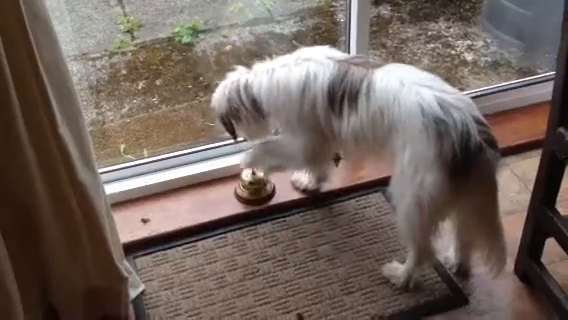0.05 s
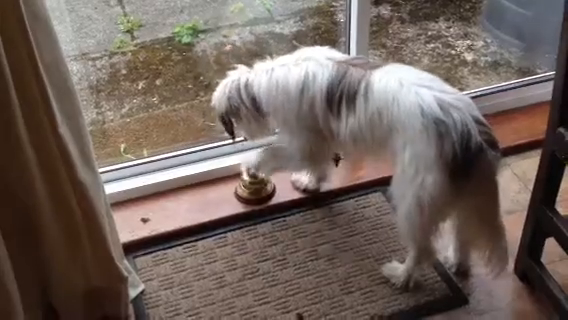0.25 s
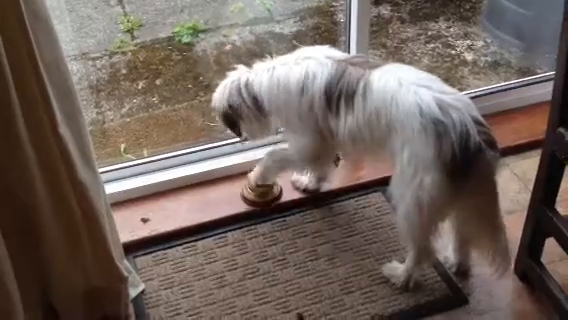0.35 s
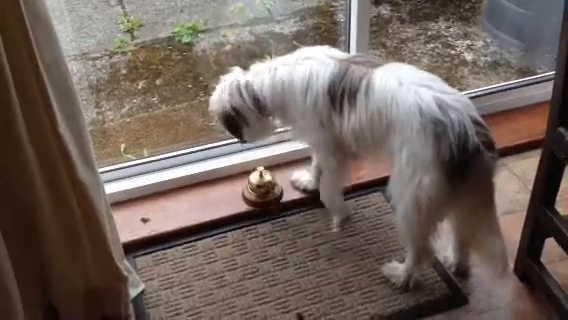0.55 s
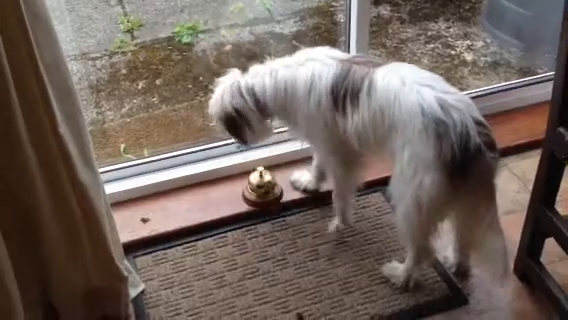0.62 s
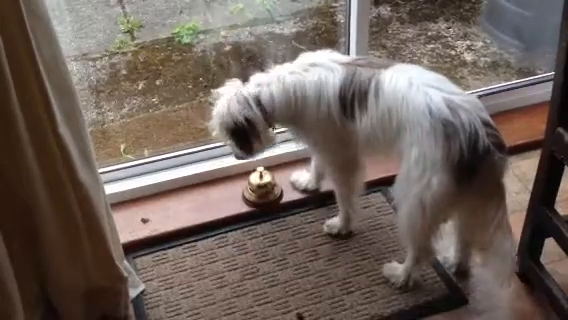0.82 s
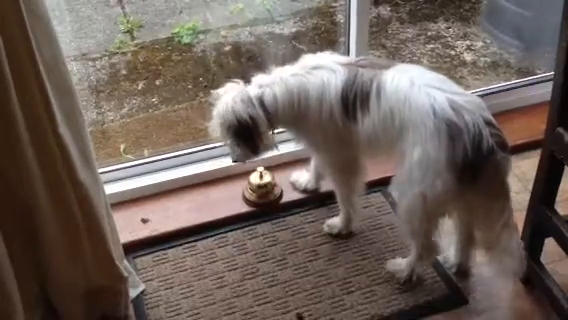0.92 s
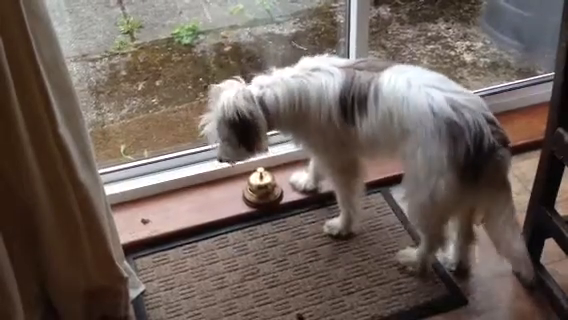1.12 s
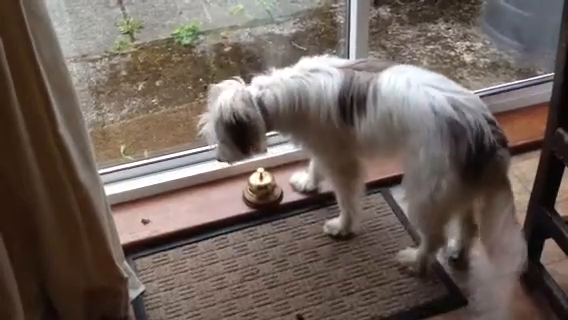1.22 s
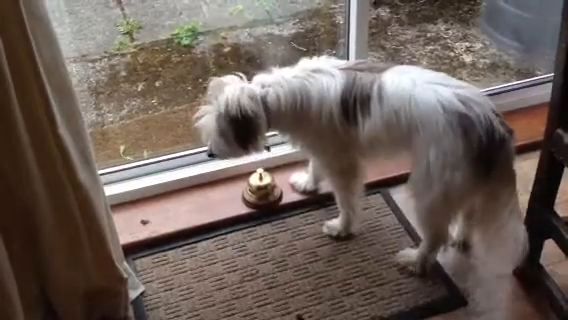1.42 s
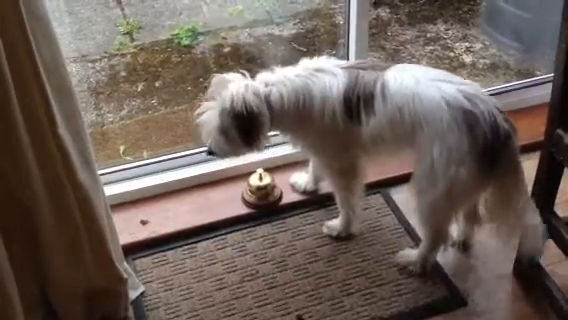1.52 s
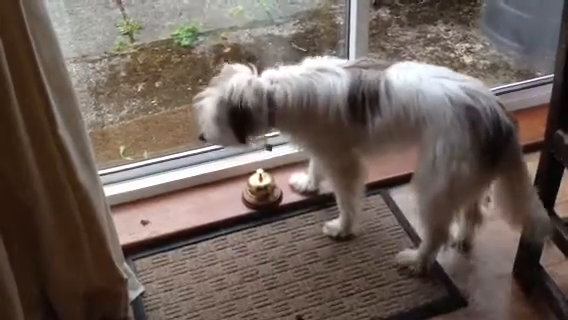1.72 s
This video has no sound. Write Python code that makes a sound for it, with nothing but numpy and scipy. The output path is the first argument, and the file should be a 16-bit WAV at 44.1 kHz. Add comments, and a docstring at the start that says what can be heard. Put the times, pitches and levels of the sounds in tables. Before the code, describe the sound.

Faint wooden rubbing and tiny clicks lead to a bright counter bell strike, pawed by a dog; the high ring decays slowly over soft room hush, with faint paw rustles, picked up by a phone nearby indoors.

```python
"""A dog paws a brass desk bell on a wooden sill, a few metres from the phone in a quiet, hushed room.
An earlier muted blow dies away while the base judders on the wood: stick-slip jolts and rubbing excite resonances.
Claw and plunger ticks (band-passed noise) lead to the clapper strike near 0.23 s and a weaker blow just after.
The strike cracks (noise), thumps the sill and rings the dome in split, beating modes (decaying sines).
Under the long ring the judder fades out; faint rustles of fur and paws and three late ticks follow."""
import sys
import numpy as np
from scipy import signal
from scipy.fft import rfft, irfft, next_fast_len
from scipy.io import wavfile
from scipy.ndimage import uniform_filter1d

SR = 44100
rng = np.random.default_rng(int(sys.argv[2]) if len(sys.argv) > 2 else 0)


def linear_from_db(decibels):
    """Turn decibels (scalar or array-like) into linear amplitude factors; 0 gives 1."""
    return 10 ** (np.asarray(decibels, float) / 20)


def file_out(sig):
    """Save sig as 16-bit WAV at sys.argv[1]."""
    # one column per channel
    cols = np.atleast_2d(sig).T
    # limit, then scale
    lim = np.clip(cols, -1, 1)
    pcm = np.round(lim * 32767).astype(np.int16)
    wavfile.write(sys.argv[1], SR, pcm)


N = 77175
LEAD = SR // 4  # samples computed ahead of t = 0, to hold the earlier blow
T = np.arange(-LEAD, N) / SR  # s

# clapper blows: t/s, ring level/dB, crack level/dB, longest T60 that the paw allows/s
BLOWS = [(-.09, -39, -38, .45), (.2328, 0, -16, 20), (.2465, -30, -28, 20)]


def curve(table, x, col=1, log=False):
    """Linear interpolation of a table column, over the first column or its logarithm."""
    points = np.array(table, float)
    scale = np.log if log else np.asarray
    return np.interp(scale(x), scale(points[:, 0]), points[:, col])


def unit(x):
    """Normalisation to an rms value of 1."""
    return x / np.sqrt(np.mean(x ** 2))


def noise():
    """White Gaussian noise: equal mean power at all frequencies."""
    return rng.standard_normal(len(T))


def shape(x, gain):
    """Linear filtering: the spectrum is multiplied by a real gain, a function of f/Hz."""
    n = next_fast_len(len(x))
    hz = np.maximum(np.arange(n // 2 + 1) * SR / n, 1)
    return irfft(rfft(x, n) * gain(hz), n)[:len(x)]


def band(x, hz, width):
    """Damped resonator: a pole pair whose radius sets the bandwidth; about unit gain at the centre."""
    angle = 2 * np.pi * hz / SR
    radius = np.exp(-np.pi * width / SR)
    gain = (1 - radius * radius) / 2
    return signal.lfilter([gain, 0, -gain], [1, -2 * radius * np.cos(angle), radius * radius], x)


def fade(t0, t60, rise=.0013):
    """Exponential decay of 60 dB per t60, after a build-up over the contact time (rise, s)."""
    age = np.maximum(T - t0, 0)
    return (1 - np.exp(-age / rise)) * np.exp(-np.log(1000) * age / t60)


def air():
    """Stationary broadband noise: the hush of room and microphone, with a slight slow flicker in level."""
    # spectrum of the hush, relative: f/Hz, level per Hz/dB
    hush_spectrum = [(25, -24.5), (100, -18.5), (200, -16), (332, -18.5), (700, -18.5), (1200, -19),
                     (2640, -25), (4780, -27), (7500, -26), (10000, -36), (13000, -27.5), (15600, -31.5)]
    level_db, flicker_db = -76, 0.5  # rms in the reference band; rms of the flicker
    hush = shape(noise(), lambda hz: linear_from_db(curve(hush_spectrum, hz, log=True)))
    reference_band = shape(hush, lambda hz: (hz > 1300) * (hz < 2600))
    reference = np.sqrt(np.mean(reference_band ** 2))
    flicker = unit(uniform_filter1d(uniform_filter1d(noise(), 3000), 3000))
    return hush / reference * linear_from_db(level_db + flicker_db * flicker)


def room(x):
    """Diffuse reverberation: convolution with octave-band noise, each band decaying at its own rate."""
    # reverberation time: f/Hz, T60/s
    reverb_times = [(200, 0.28), (1500, 0.3), (6000, 0.72), (15000, 0.1)]
    t = np.arange(SR) / SR
    build_up = 1 - np.exp(-t / .006)
    tail = 0
    for hz in 125 * 2. ** np.arange(8):
        limits = [hz / 2 ** .5, min(hz * 2 ** .5, SR / 2.2)]
        octave = signal.butter(2, limits, "band", fs=SR, output="sos")
        part = signal.sosfilt(octave, rng.standard_normal(SR))
        t60 = curve(reverb_times, hz, log=True)
        decay = np.exp(-np.log(1000) * t / t60)
        tail = tail + part * decay * build_up / np.sqrt(t60)
    return signal.fftconvolve(x, tail / np.sqrt(np.sum(tail ** 2)))[:len(x)]  # unit-energy tail


def tint(hz, width):
    """Resonant filtering of noise: two equal resonators in cascade, scaled to rms 1."""
    return unit(band(band(noise(), hz, width), hz, width))


def rustles():
    """Friction noise of fur and paws: band-passed noise under Gaussian swells."""
    # t/s, level/dB, f/Hz, bandwidth of each resonator/Hz, length between the 1/e points/s
    rustle_rows = [(.73, -72, 9000, 14000, .03), (.76, -70, 700, 600, .06), (.995, -66, 5000, 14000, .02),
                   (1.07, -70, 4800, 3000, .015), (1.265, -66, 2200, 2500, .03),
                   (1.385, -69, 12500, 5000, .03), (1.4, -65, 1800, 2000, .07), (1.5, -72, 3500, 6000, .06),
                   (1.45, -72, 350, 300, .2), (.9, -74, 1500, 1200, .04)]
    out = 0
    for t0, db, hz, width, length in rustle_rows:
        swell = np.exp(-((T - t0) / length * 2) ** 2)
        out = out + linear_from_db(db) * swell * tint(hz, width)
    return out


def ticks():
    """Brief impacts of claw and plunger: band-passed noise with a fast rise and exponential decay."""
    # the first three belong to the earlier blow
    # t/s, level/dB, f/Hz, bandwidth of each resonator/Hz, T60/s
    tick_rows = [(-.08, -53, 7700, 300, .5), (-.08, -57, 7200, 3000, .5), (-.08, -60, 13500, 3500, .5),
                 (.1893, -48, 6500, 6000, .02), (.2085, -46, 7200, 2500, .05),
                 (.2135, -43, 6800, 2500, .04), (.2203, -31, 6500, 8000, .022),
                 (.2245, -38, 8300, 3000, .04), (.2205, -42, 1500, 1500, .03),
                 (.2335, -36, 1500, 1500, .05), (1.46, -62, 6000, 2000, .015),
                 (1.4863, -56, 5800, 2500, .02), (1.515, -61, 6200, 2000, .015)]
    out = 0
    for t0, db, hz, width, t60 in tick_rows:
        out = out + linear_from_db(db) * fade(t0, t60, .0006) * tint(hz, width)
    return out


def small_sounds():
    """Uneven contact: amplitude modulation by smoothed noise roughens ticks and rustles."""
    grain = linear_from_db(1 * unit(uniform_filter1d(noise(), size=90)))  # 1 dB rms
    return (ticks() + rustles()) * unit(grain)


def sill():
    """Stick-slip excitation: jolts and rubbing noise ring the wood's resonances; the strike thumps it."""
    # wood resonances, six low ones and then three above 1 kHz: f/Hz, bandwidth/Hz, level/dB
    wood_modes = [(154, 43, -9), (186, 40, -3.5), (232, 40, -6), (368, 100, -8.5), (466.3, 29, -9.5),
                  (600.5, 71, -16.5), (1382, 150, -3.5), (1675, 100, -4), (2142, 220, -12)]
    # base dragging on the sill: t/s, level of the low modes/dB, level of the modes above 1 kHz/dB
    drag_levels = [(0, -61.5, -81), (.065, -63, -100.5), (.085, -55.5, -63), (.13, -57.5, -68),
                   (.185, -60, -72), (.22, -46.5, -44.5), (.3, -52.5, -55), (.35, -58.5, -60),
                   (.39, -58.5, -55), (.45, -56.5, -63), (.49, -58.5, -59.5), (.55, -67.5, -71.5),
                   (.62, -72.5, -80.5), (.72, -85.5, -89.5)]
    low_modes, high_modes = wood_modes[:6], wood_modes[6:]

    judder_per_s, scatter, jolt_db = 42, 0.15, 3.5  # median rate; log-normal spread; spread in level
    rub_low_db, rub_high_db = 3.5, 7  # rubbing relative to the jolts
    chance = rng.standard_normal((200, 2))
    intervals = np.exp(scatter * chance[:, 0]) / judder_per_s * SR
    at = np.cumsum(intervals).astype(int)
    inside = at < len(T)
    jolts = np.zeros(len(T))
    jolts[at[inside]] = linear_from_db(jolt_db * chance[inside, 1])
    low_push = unit(jolts) + linear_from_db(rub_low_db) * noise()
    high_push = unit(jolts) + linear_from_db(rub_high_db) * noise()

    thump = unit(sum(linear_from_db(db) * band(noise(), hz, width) for hz, width, db in low_modes))
    out = linear_from_db(-49.5) * fade(0.26, 0.28, 0.0035) * thump
    for col, push, modes in ((1, low_push, low_modes), (2, high_push, high_modes)):
        wood = 0
        for k, (hz, width, db) in enumerate(modes):
            wood = wood + (-1) ** k * linear_from_db(db) * band(push, hz, width)  # alternating polarity
        dragging = T < drag_levels[-1][0]
        out = out + unit(wood) * linear_from_db(curve(drag_levels, T, col)) * dragging
    return out


def cracks():
    """Impact noise: each short clapper blow radiates a broadband burst with exponential decay."""
    # spectrum of the crack, relative: f/Hz, level per Hz/dB
    crack_spectrum = [(59, -61), (100, -32), (1110, -21), (4560, -16.5), (4860, -13.5), (5750, -25),
                      (7250, -4.5), (8770, -36), (9950, -17.5), (13700, -13.5), (15500, -26)]
    hiss = unit(shape(noise(), lambda hz: linear_from_db(curve(crack_spectrum, hz, log=True))))
    return hiss * sum(linear_from_db(db) * fade(t0, .02) for t0, _, db, _ in BLOWS)  # T60 0.02 s


def dome():
    """Modal superposition: every blow starts all modes as decaying sines; close frequencies beat."""
    # split pairs and triples of modes: f/Hz, level at ring level 0/dB, T60/s, sign of the first swing
    dome_modes = [(1104.8, -49.4, 5.95, 1), (1106.0, -44.1, 5.95, 1), (1106.2, -50.4, 4.02, -1),
                  (2212.5, -76, 4.5, 1), (2819.7, -52.7, 2.22, 1), (2830.0, -43.1, 1.57, 1),
                  (2830.8, -39.8, .73, -1), (2831.2, -50.8, 5.47, -1), (4937.7, -35.3, 1.72, 1),
                  (4943.8, -27.7, .92, 1), (4944.6, -22.3, 1.47, 1), (5448, -38, .07, 1),
                  (5852, -50, .26, 1), (5909, -48, .2, 1), (7375.9, -39.4, .78, -1),
                  (7395.0, -18.8, .81, 1), (7398.1, -24.5, .61, -1), (7400.8, -23.9, .7, 1),
                  (7714, -42, .3, 1), (7874, -44, .25, 1), (9103, -48, .15, 1), (10174.7, -35, .7, 1),
                  (10176.2, -41, .8, 1), (10181.1, -35, .7, 1), (10184.3, -35, .66, -1),
                  (10193.8, -35.3, .47, 1), (10875.6, -35, .17, 1), (10887.4, -41, .36, 1),
                  (12340, -48, .35, 1), (13306.8, -16.8, .17, 1), (14744.8, -35, .22, 1),
                  (14788.5, -39, .49, 1), (14805.5, -37, .19, -1)]
    out = 0
    for t0, ring_db, _, longest in BLOWS:
        for hz, db, t60, sign in dome_modes:
            swing = sign * np.sin(2 * np.pi * hz * (T - t0))
            out = out + linear_from_db(ring_db + db) * swing * fade(t0, min(t60, longest))
    return out


def scene():
    """Superposition of direct sound, reverberation and hush, from t = 0 on."""
    ring, crack, small = dome(), cracks(), small_sounds() + sill()
    # reverberant share of each source, dB
    wet = room(linear_from_db(-24) * ring + linear_from_db(-5) * crack + linear_from_db(-7.5) * small)
    return (ring + crack + small + wet + air())[None, LEAD:]


def band_limit(x):
    """A steep low-pass at the top of the band."""
    return signal.sosfilt(signal.butter(12, 15770, fs=SR, output="sos"), x)


def record(dry):
    """Band limitation: the phone cuts the deep bass below 125 Hz and the top above 15.5 kHz."""
    bass_cut = signal.butter(5, 125, "high", fs=SR, output="sos")
    top_cut = signal.ellip(8, .2, 60, 15500, fs=SR, output="sos")
    mix = signal.sosfilt(top_cut, signal.sosfilt(bass_cut, dry))
    return band_limit(mix)


dry = scene()
out = record(dry)
file_out(out)
```